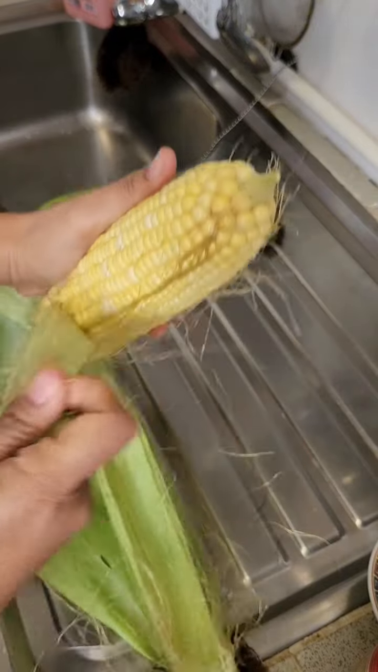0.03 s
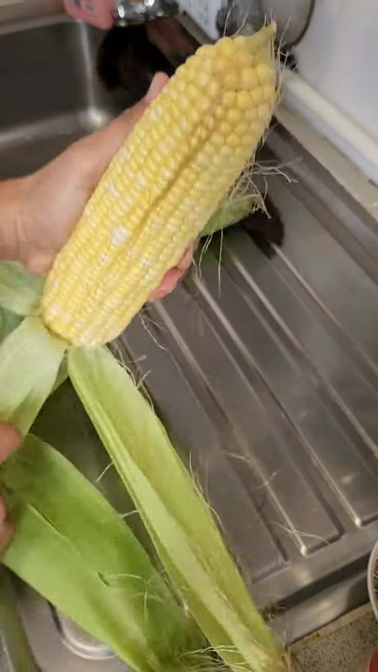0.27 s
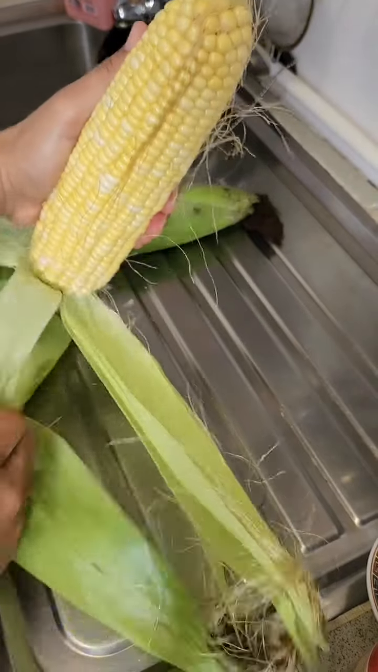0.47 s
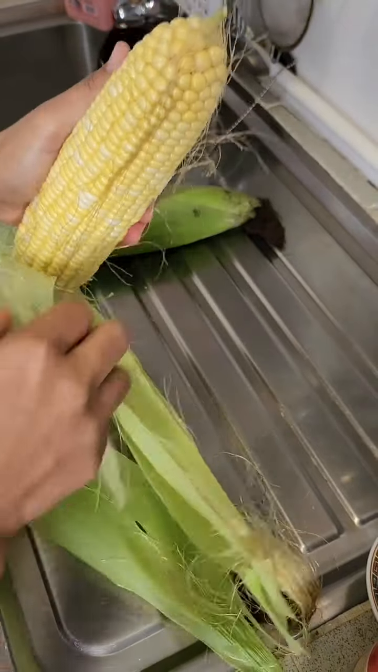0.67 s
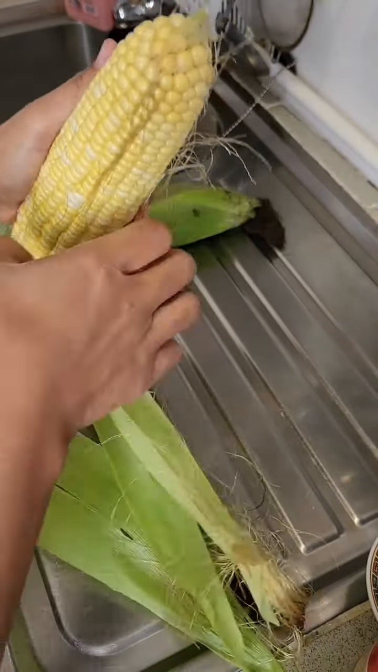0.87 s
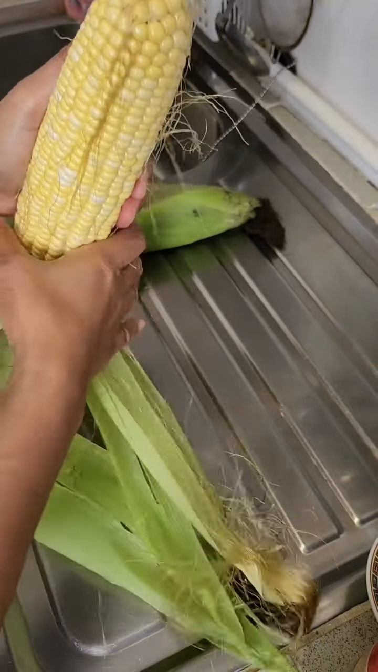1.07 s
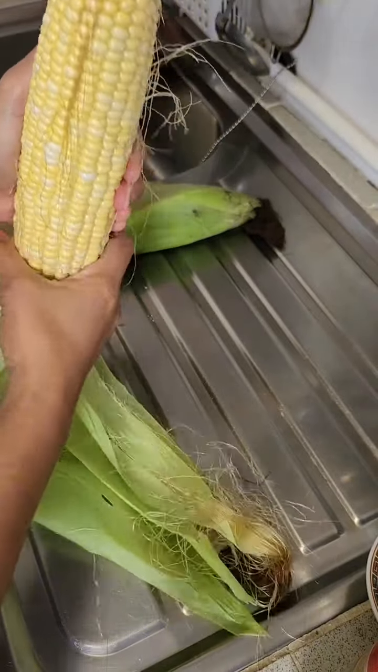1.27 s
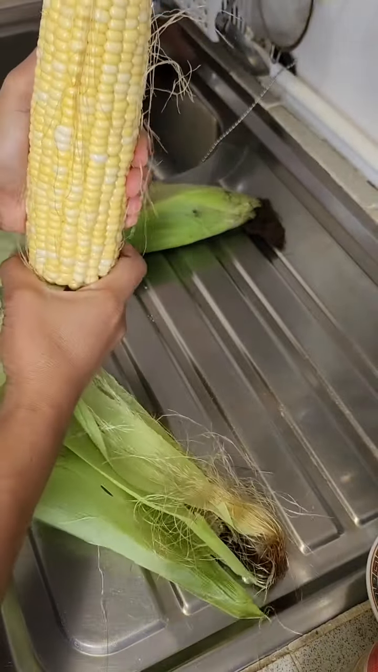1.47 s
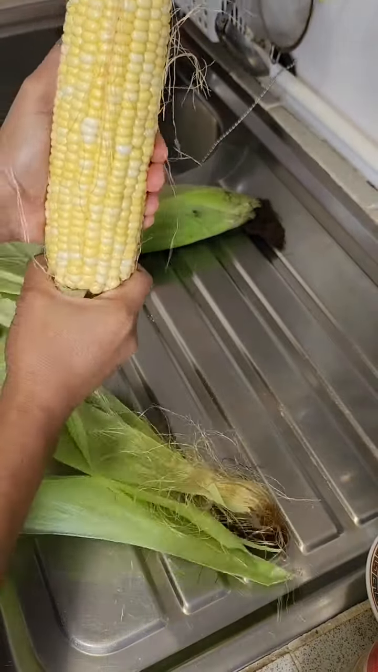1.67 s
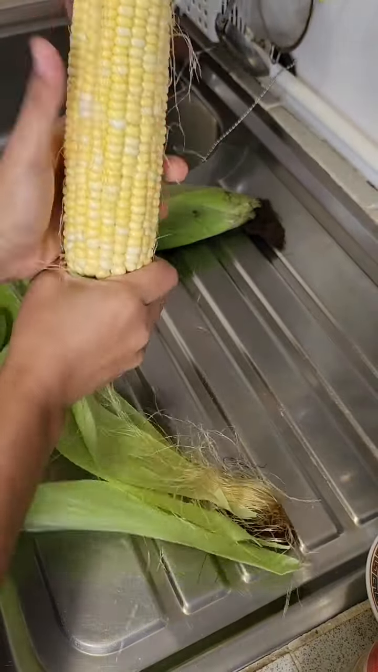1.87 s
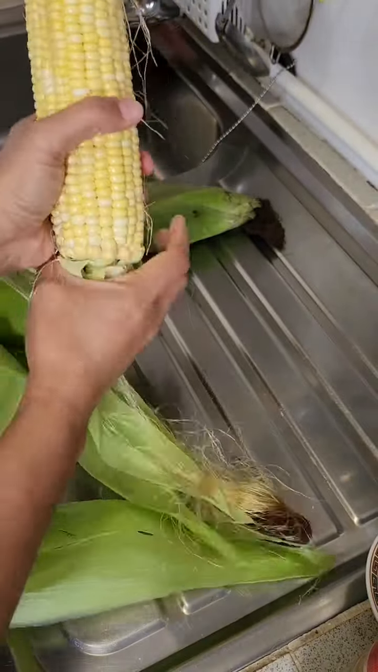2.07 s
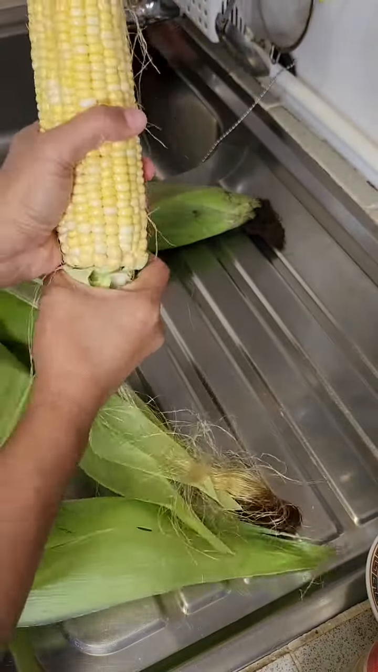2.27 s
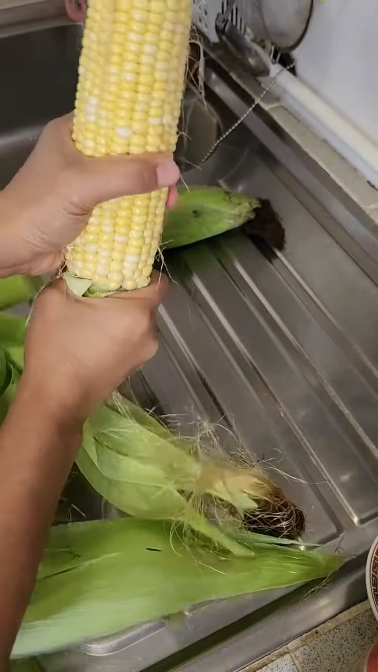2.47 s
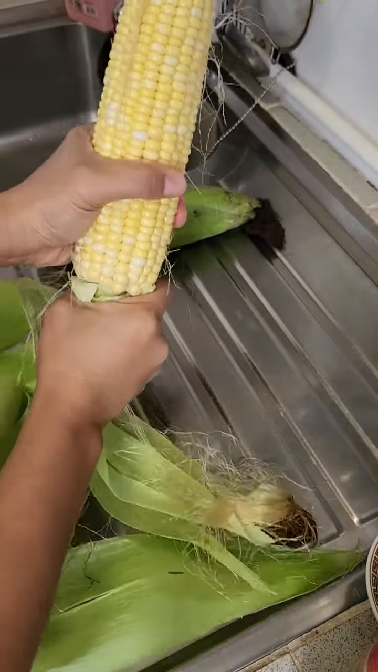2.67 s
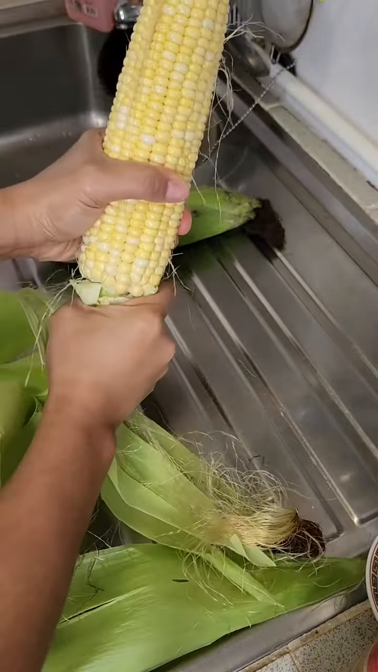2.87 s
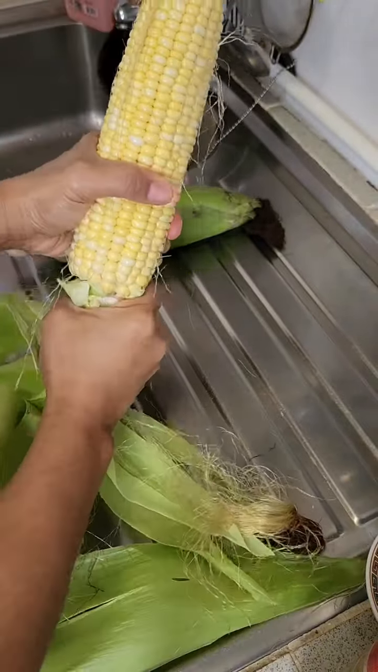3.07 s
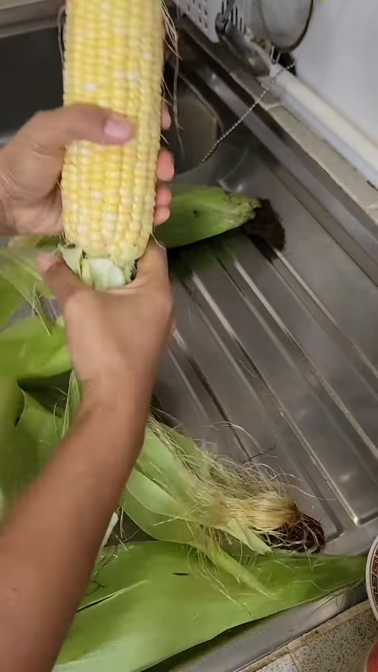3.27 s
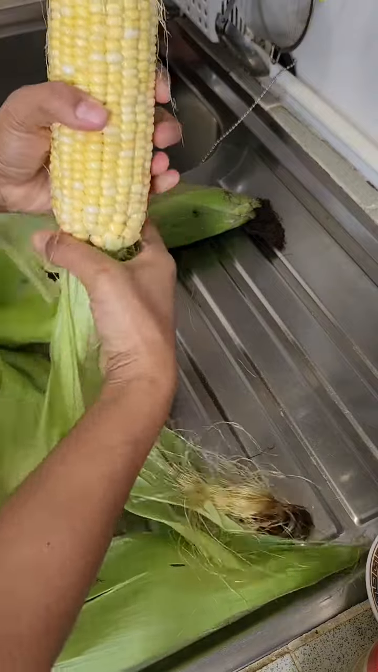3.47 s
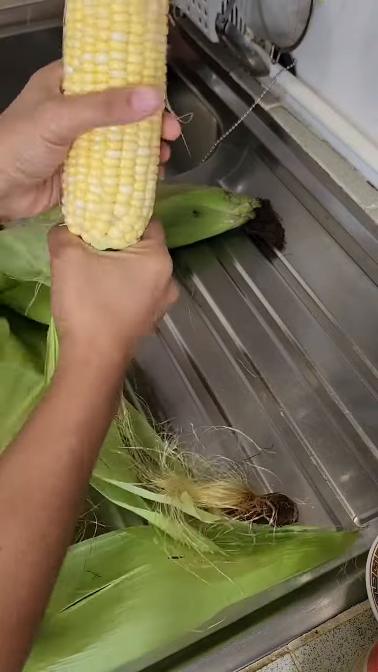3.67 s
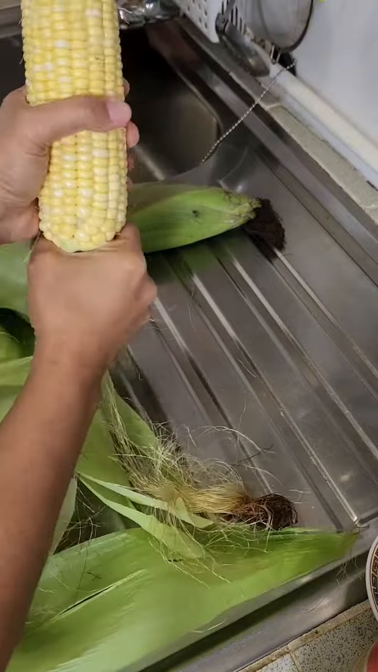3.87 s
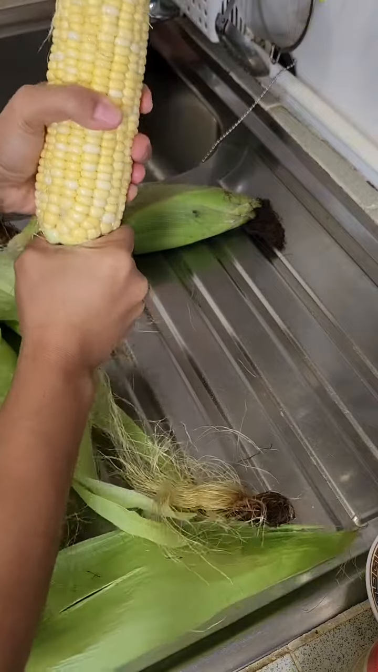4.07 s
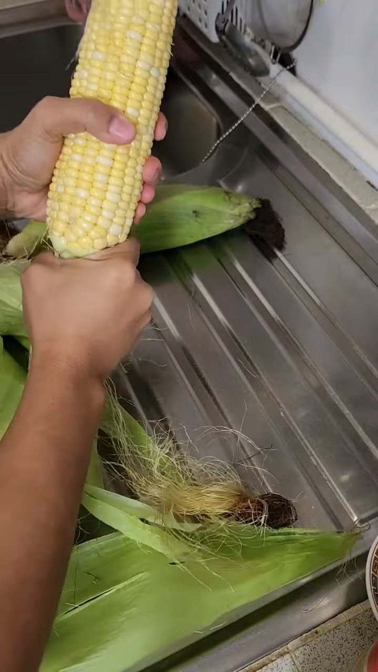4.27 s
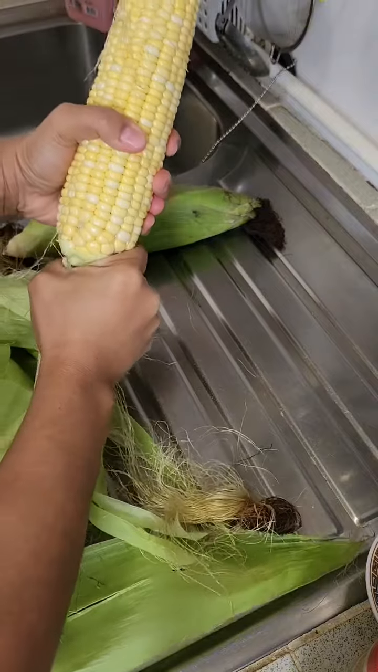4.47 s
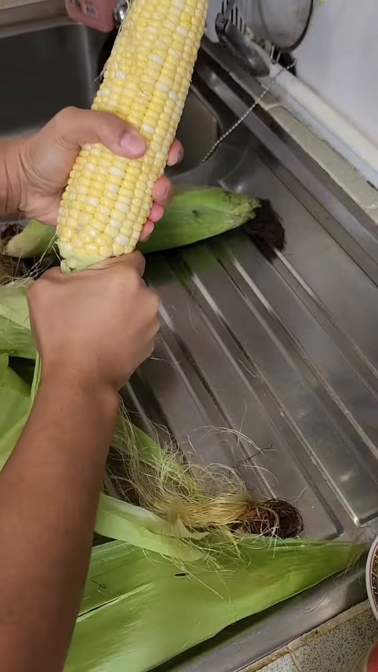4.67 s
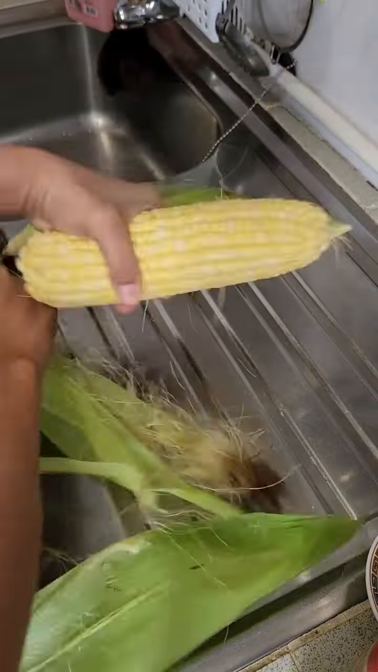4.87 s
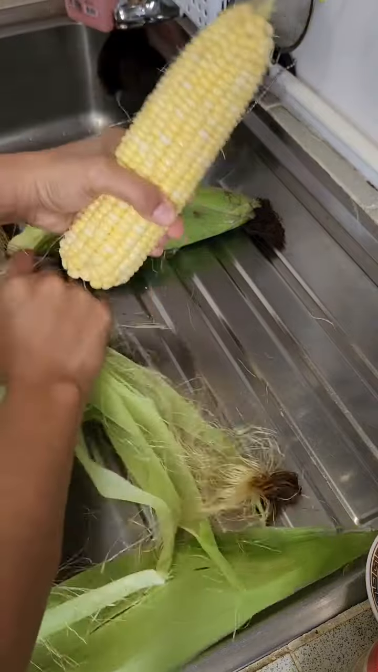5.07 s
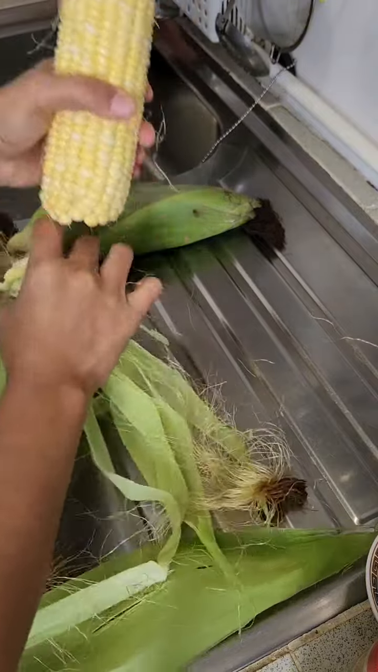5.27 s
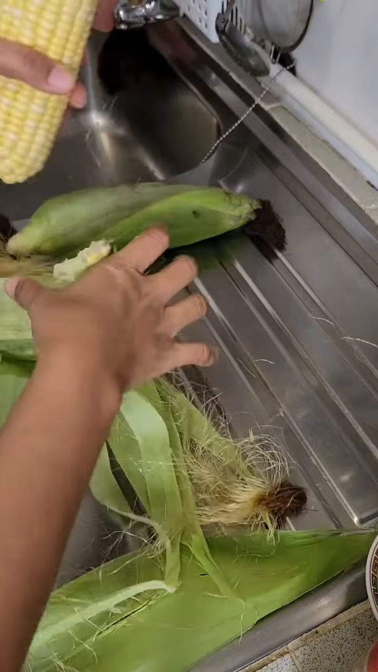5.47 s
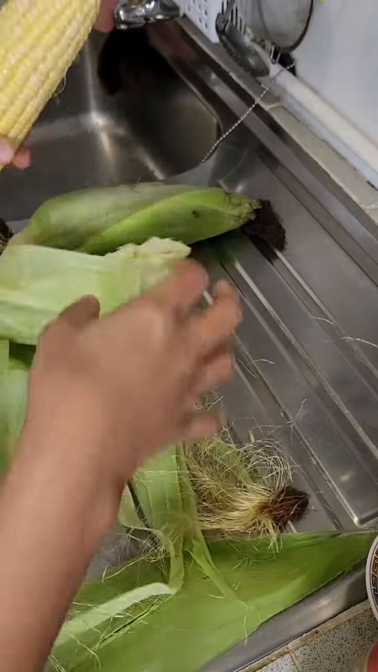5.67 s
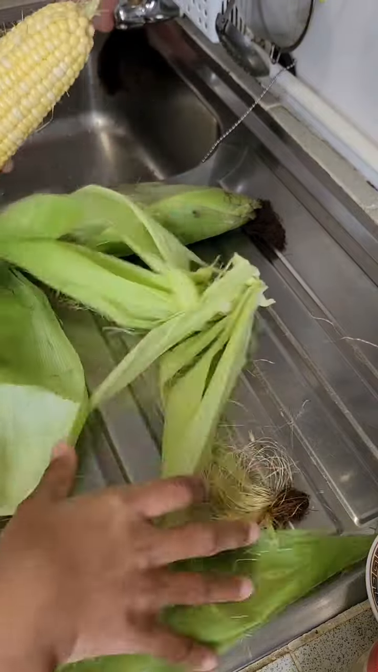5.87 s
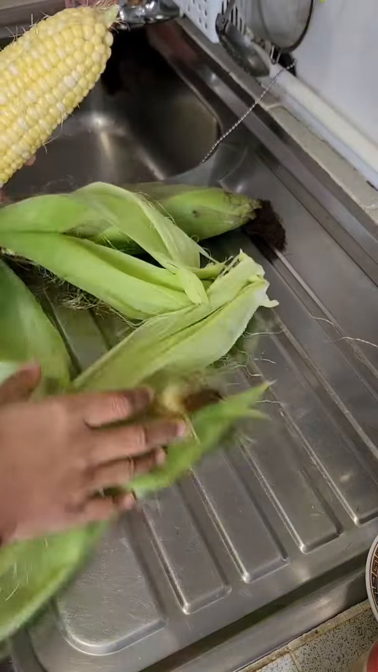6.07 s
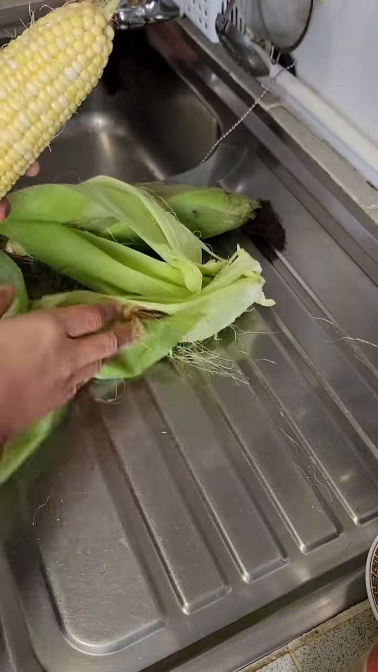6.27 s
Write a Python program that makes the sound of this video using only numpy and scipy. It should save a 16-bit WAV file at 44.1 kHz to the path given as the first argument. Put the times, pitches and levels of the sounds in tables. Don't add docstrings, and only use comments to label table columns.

```python
import sys
import numpy as np
from scipy import signal
from scipy.fft import rfft, irfft, next_fast_len
from scipy.io import wavfile

SR = 44100
rng = np.random.default_rng(int(sys.argv[2]) if len(sys.argv) > 2 else 0)


def natural_amplitude(level_db):
    exponent = np.asarray(level_db, float) / 20
    return 10 ** exponent


def pcm_store(signal):
    levels = np.round(np.clip(np.atleast_2d(signal), -1, 1) * 32767)
    wavfile.write(sys.argv[1], SR, levels.astype(np.int16).T)


N = 278712

# start_s, effort_db, dryness_db
LEAF_SLIDING = [(0, -62.5, -1), (.3, -52.5, -7), (.64, -69.5, 0), (.92, -71.5, -1.5), (.945, -63.5, 1),
                (1.2, -59.5, -2), (1.9, -62, -3), (2.39, -48.5, -7.5), (2.8, -68, 7), (3.2, -53, -9.5),
                (3.465, -65, -4), (3.5, -51.5, -8), (4.05, -54, 0), (4.4, -64, 0), (4.98, -53.5, -4),
                (5.58, -67.5, -8.5), (5.9, -53.5, -4.5), (6.32, -54, -6)]
# start_s, peak_db, edge_above_6_khz_db, t60_s
STALK_BREAK = [
    (4.7715, -8, -18, 0.34),
]
REST_EFFORT_DB = -60
PORT_LAG_S = .00012
FIRST_CLICK = 5


def rms_one(x):
    return x / np.sqrt(np.mean(x ** 2) + 1e-20)


def in_time(rows):
    s, *columns = np.transpose(rows)
    return [np.interp(np.arange(N) / SR, s, c) for c in columns]


def at_hz(points, hz):
    point_hz, point_value = np.transpose(points)
    return np.interp(np.log(hz), np.log(point_hz), point_value)


def add_at(out, start_s, sound):
    i = round(start_s * SR)
    out[..., i:i + sound.shape[-1]] += sound[..., :N - i]


def drift(rate):
    r = np.exp(-80 * np.pi * rate / SR)
    slow = signal.lfilter([1], [1, -2 * r, r * r], rng.standard_normal(N // 40 + 2002))[2000:]
    return np.interp(np.arange(N) / 40, np.arange(len(slow)), rms_one(slow))


def delayed(x, lag_s):
    return np.interp(np.arange(N) - lag_s * SR, np.arange(N), x)


def ring(clicks, hz, t60):
    r, w = natural_amplitude(-60 / (t60 * SR)), 2 * np.pi * hz / SR
    return signal.lfilter([0, np.sin(w)], [1, -2 * r * np.cos(w), r * r], clicks + 1e-18)


def fibres(per_s, spread_db, clump_db):
    sizes = natural_amplitude(spread_db * np.minimum(rng.exponential(1, N), 4)) * rng.choice([-1, 1], N)
    breaks = rng.random(N) < per_s / SR
    return rms_one(sizes * breaks * natural_amplitude(clump_db * drift(260)))


def fibre_pair(per_s, spread_db, clump_db):
    near = fibres(per_s, spread_db, clump_db)
    return near, delayed(near, PORT_LAG_S), fibres(per_s, spread_db, clump_db)


def at_both_ports(pair, alike):
    near, late, other = pair
    alike = np.clip(alike, 0, 1)
    return np.array([near, np.sqrt(alike) * late + np.sqrt(1 - alike) * other])


def rumble():
    # start_s, level_db
    traffic = [(0.0, -47.5), (0.33, -47.5), (0.86, -50), (1.34, -48), (2.08, -47), (3.01, -53),
               (3.99, -47.5), (4.42, -55), (4.82, -46), (5.56, -63.5), (6.13, -49), (6.32, -50)]
    # pitch_hz, width_hz, level_db
    room_modes = [(49.1, 41, -1.5), (63.8, 8.8, 5.5), (111.8, 13, 3), (178, 34, -7), (213.8, 15.5, -5.5),
                  (326, 41, -6), (381.3, 24, -8.5)]
    traffic_db, = in_time(traffic)
    deep_db = traffic_db - 3.5 + 0.5 * drift(4.4)
    grip_db = in_time(LEAF_SLIDING)[0] - REST_EFFORT_DB
    upper_db = -50.5 + 0.48 * (traffic_db - traffic_db.mean()) + 0.5 * drift(5.8)
    upper_db = upper_db + 0.11 * grip_db
    out = 0
    for hz, width_hz, level_db in room_modes:
        r = np.exp(-np.pi * width_hz / SR)
        a = [1, -2 * r * np.cos(2 * np.pi * hz / SR), r * r]
        noise = rng.standard_normal((2, N + SR // 2))
        narrow = signal.lfilter([1, 0, -1], a, signal.lfilter([1, 0, -1], a, noise))
        mid, side = narrow[:, SR // 2:]
        both = rms_one(mid) + natural_amplitude(-12) * rms_one(side) * np.c_[[1, -1]]
        out = out + natural_amplitude(level_db + (deep_db if hz < 150 else upper_db)) * both
    return out


def air():
    # frequency_hz, level_db per Hz
    air_colour = [(18, -22), (30, -7), (48, 4.5), (115, -5), (149, -19.5), (210, -10), (311, -16),
                  (866, -18.5), (1150, -29.5), (2000, -39), (16000, -62.5)]
    hz = np.maximum(np.arange(N // 2 + 1) * SR / N, 1)
    mid, side = rfft(rng.standard_normal((2, N))) * natural_amplitude(at_hz(air_colour, hz))
    scale = natural_amplitude(-59.5) * N / np.sqrt(2 * np.sum(np.abs(mid[hz > 500]) ** 2))
    side = side * natural_amplitude(at_hz([(150, -13.5), (1200, 0.5)], hz))
    ducked = natural_amplitude(0.061 * np.minimum(in_time(LEAF_SLIDING)[0] - REST_EFFORT_DB, 0))
    return ducked * scale * irfft(np.array([mid + side, mid - side]), N)


def tears():
    # start_s, peak_db, edge_above_6_khz_db, t60_s
    thin_snaps = [(.1063, -37, 0.5, 0.64), (.1569, -31, -24, 0.1), (1.1358, -43, 3.5, 0.17),
                  (1.3510, -50.5, 23.5, 0.059), (1.3803, -34, 6.5, 0.064), (1.4580, -25, -4.5, 0.14),
                  (1.6844, -47.5, 21, 0.045), (2.222, -27, -4.5, 0.37), (2.241, -45, 9, 0.19),
                  (2.2594, -27, -32, 0.55), (2.4366, -38.5, 3.5, 0.69), (.171, -23.5, 2, 0.13),
                  (2.5344, -24, -14.5, 0.12), (2.7161, -11.5, -16, 0.049), (3.1492, -30.5, -5, 0.86),
                  (3.2106, -20.5, -19, 0.1), (3.949, -18.5, -6.5, 0.081), (4.1607, -43, 4, 0.085),
                  (4.2093, -47.5, 11.5, 0.12), (4.5253, -31, 3.5, 0.061), (4.9326, -20.5, -32, 0.13),
                  (2.817, -17.5, -7.5, 0.048)]
    thin_rips = [(.1297, -11.5, -10, 0.052), (2.4655, -15.5, -9, 0.077), (.2452, -30.5, 8, 0.11),
                 (1.2191, -31.5, -5.5, 0.23), (1.5802, -35, 7.5, 0.066), (2.5002, -8.5, -7, 0.047),
                 (2.6404, -26, -5, 0.23), (3.0475, -34.5, -4.5, 0.17), (3.3214, -33, -19, 0.16),
                 (3.6327, -21, -26, 0.091), (4.0218, -27.5, -7, 0.23), (4.569, -38.5, -2, 0.14),
                 (5.875, -19, -23, 0.062), (5.68, -43, -38, 0.44), (4.7485, -49, -11.5, 0.036),
                 (4.7685, -13, -12, 0.032)]
    thick_snaps = [(.2248, -15.5, -24, 0.053), (.3487, -25.5, -4, 0.11), (.4987, -28.5, -23, 0.11),
                   (.9373, -51.5, 0.5, 0.047), (1.05, -38.5, -13, 0.16), (1.2365, -18.5, -6, 0.032),
                   (1.5045, -26.5, -3.5, 0.25), (1.5278, -30.5, -18.5, 1), (2.0507, -28, -20, 0.14),
                   (2.3126, -22.5, -7.5, 0.57), (2.3537, -18.5, -14, 0.33), (2.382, -18, -17, 0.18),
                   (2.6278, -19, -6, 0.037), (2.9628, -22.5, -7.5, 0.17), (3.5358, -29.5, -7.5, 0.24),
                   (3.8222, -27, -25, 0.21), (3.918, -15, -33, 0.091), (3.9885, -25, -19, 0.11),
                   (4.089, -37, 6, 0.041), (4.2954, -21, -3.5, 0.075), (4.3088, -20.5, -3.5, 0.11),
                   (4.6626, -34.5, -6, 0.079), (4.8936, -28, -9, 0.12), (5.1048, -32, -56, 0.092),
                   (5.216, -28, -29, 0.085), (5.3138, -38.5, -14, 0.33), (5.4574, -35.5, -18, 0.33),
                   (5.938, -39, -10, 0.49), (2.19, -48, 5, 0.025), (2.69, -26, -6, 0.1)]
    thick_rips = [(.0568, -30, -5.5, 0.11), (.0940, -23.5, -3, 0.17), (.264, -19.5, 1, 0.06),
                  (.3165, -31, -3, 0.078), (.3267, -6.5, -19, 0.027), (.4226, -33, -13.5, 0.87),
                  (1.12, -41.5, 1, 0.13), (1.4371, -37, -9, 0.11), (1.5474, -23.5, -12, 0.058),
                  (1.7709, -29.5, -12, 0.15), (1.9964, -34, -22, 1), (2.585, -33.5, 1, 0.11),
                  (2.6745, -6, -11.5, 0.19), (2.8565, -12.5, -7.5, 0.14), (3.083, -33, -4, 0.036),
                  (3.492, -27.5, -16, 0.36), (3.8442, -23, -18, 0.52), (3.8867, -20, -15, 0.29),
                  (4.0472, -27.5, -8, 0.19), (4.126, -17.5, -8, 0.018), (4.442, -38, -7, 0.093),
                  (4.8492, -17, -32, 0.21), (5.0641, -29, -42, 0.058), (5.1377, -27.5, -21, 0.076),
                  (5.1976, -40, -7.5, 0.15), (5.701, -38, -14, 0.11), (4.782, -19.5, 1.5, 0.11),
                  (5.6, -37.5, -50, 0.63), (6.097, -49.5, 6, 0.079), (6.223, -35, -5, 0.21)]
    kinds = [(thin_snaps, -11.5, 2.5), (thin_rips, -11.5, -7), (thick_snaps, -3, 2.5),
             (thick_rips, -3, -7), (STALK_BREAK, -20.5, 22.5)]
    return [(s, peak_db, body_db, edge_db, t60, first_db)
            for rows, body_db, first_db in kinds for s, peak_db, edge_db, t60 in rows]


def tear_envelopes(centres, body, edge):
    tearing, after, events = np.zeros((len(centres), N)), np.arange(SR // 4) / SR, tears()
    colours = 2 * rng.standard_normal((len(events), len(centres)))
    for (s, peak_db, body_db, edge_db, t60, snap_db), own_db in zip(events, colours):
        snap = natural_amplitude(snap_db - 60 * after / (.011 + 0.055 * t60))
        tail = natural_amplitude(-60 * after / (t60 * (1 + 0.076 * body[:, None])))
        gains = natural_amplitude(peak_db - 22.5 + body * body_db + edge * (edge_db + 4.5) + own_db)
        rise_s = .0007 * natural_amplitude(-1.3 * min(snap_db, 4))
        add_at(tearing, s, gains[:, None] * (snap + tail) * np.clip(after / rise_s, 0, 1))
    return tearing


def husks():
    # frequency_hz, level_db per band
    husk_colour = [(300, -4.5), (500, -8), (900, -5), (1500, -1.5), (2200, -1), (3500, 2.5), (5000, 8.5),
                   (7500, 0.5), (11000, 11), (16000, 0.5)]
    # frequency_hz, left_over_right_db
    ear_tilt = [(60, -1.0), (150, 12), (380, -10), (950, -2.5), (2380, -3.5), (5980, 6), (15000, -5)]
    # frequency_hz, common_share
    likeness = [(300, 1), (700, 0.68), (1500, 0.057), (5000, 0.013), (14000, 0.18)]
    edges = 300 * 2 ** np.arange(0, 6.1, .5)
    centres = np.sqrt(edges[1:] * edges[:-1])
    body = np.clip(np.log2(1700 / centres) / 0.79, 0, 1)
    edge = np.clip(np.log2(centres / 2400) / 1.43, 0, 1)
    tearing = tear_envelopes(centres, body, edge)
    ripping, sliding = fibre_pair(11000, 3.5, 0.29), fibre_pair(14000, 1.4, 1.3)
    effort_db, dryness_db = in_time(LEAF_SLIDING)
    middle_db = effort_db - 7 - dryness_db
    hiss_db = effort_db - 5 + dryness_db
    rub_db = -53.5 + 0.4 * (effort_db - REST_EFFORT_DB)
    flutter, out = 0.95 * drift(22), 0
    for k, hz in enumerate(centres):
        level_db = (1 - body[k] - edge[k]) * middle_db + body[k] * rub_db + edge[k] * hiss_db
        alike = at_hz(likeness, hz)
        patch_db = 2.2 * np.roll(flutter, 9973 * (k + 1))
        rip = at_both_ports(ripping, alike) * tearing[k] * natural_amplitude(patch_db)
        rustle = at_both_ports(sliding, 0.62 * alike) * natural_amplitude(level_db - 5 + flutter + 2.5 * drift(8.8))
        sos = signal.butter(2, [edges[k], edges[k + 1]], "band", fs=SR, output="sos")
        per_band = (-1) ** k * np.sqrt(SR / 2 / (edges[k + 1] - edges[k]))
        colour = natural_amplitude(at_hz(husk_colour, hz) + np.c_[[.5, -.5]] * at_hz(ear_tilt, hz))
        out = out + per_band * colour * signal.sosfilt(sos, rip + rustle)
    return out


def creases(leaves):
    effort = np.sqrt(signal.lfilter([.006], [1, -.994], leaves[0] ** 2))
    buckles = effort * fibres(800, 2.5, 1.5)
    dealt = rng.integers(0, 16, N)
    out = np.zeros(N)
    for k, hz in enumerate(np.geomspace(600, 4500, 16)):
        out += ring(buckles * (dealt == k), hz, 22 / hz) * np.sqrt(hz / 2000)
    return natural_amplitude(-19) * np.array([out, natural_amplitude(-30.5) * delayed(out, PORT_LAG_S)])


def needles():
    # start_s, peak_db, centre_hz
    tough_fibres = [(0.0577, -29, 5400), (0.062, -33, 8500), (0.1008, -22, 8600), (0.1106, -18, 8000),
                    (0.1211, -23, 7900), (0.1316, -15, 5000), (0.1568, -26, 3900), (0.1719, -16, 7800),
                    (0.1859, -20, 7700), (0.2254, -26, 3500), (0.2465, -21, 7100), (0.2646, -17, 8600),
                    (0.3498, -21, 4200), (1.3515, -11, 10800), (1.3833, -12, 8500), (1.4582, -5, 6350),
                    (1.5048, -9, 6500), (1.6855, -12, 9800), (2.3551, -23, 4300), (2.3746, -20, 3900),
                    (2.4418, -22, 6700), (2.4682, -20, 5300), (2.5057, -17, 6200), (2.6763, -20, 2800),
                    (2.6846, -19, 4600), (2.7164, -16, 3300), (2.8183, -24, 4800), (2.8578, -18, 6600),
                    (2.8751, -16, 2200), (2.8872, -19, 5200), (2.9686, -13.5, 5500), (3.0504, -23, 5400),
                    (3.1495, -24, 4900), (3.2131, -21, 4100), (4.0808, -32, 5800), (4.09, -27, 6200),
                    (4.2962, -21, 7600), (4.2999, -22, 5800), (4.3103, -18, 5500), (4.5259, -31, 6700),
                    (4.5289, -20, 6400), (4.7722, -5, 4500)]
    # start_s, peak_db, centre_hz
    stalk_fibre = [
        (4.7712, -4, 3200),
    ]
    rows, span = list(tough_fibres) + list(stalk_fibre), 1.9
    out = np.zeros((2, N))
    for (s, peak_db, hz), (sign, echo) in zip(rows, rng.uniform(-1.1, 1, (len(rows), 2))):
        click = np.zeros(256)
        click[[0, int(30 + 10 * echo)]] = np.sign(sign), .45 * np.sign(echo)
        sos = signal.butter(2, [hz / span, min(hz * span, .45 * SR)], "band", fs=SR, output="sos")
        sound = signal.sosfilt(sos, click)
        sound = natural_amplitude(peak_db + 2.5) * sound / np.abs(sound).max()
        i, lag = round(s * SR), round(PORT_LAG_S * SR)
        out[0, i:i + 256] += sound
        out[1, i + lag:i + lag + 256] += sound * natural_amplitude(-5)
    return out


def volleys(rows, span):
    out, after = np.zeros((2, N)), np.arange(SR // 6) / SR
    shared, lag = 0.77, round(PORT_LAG_S * SR)
    draws = rng.standard_normal((len(rows), 3, len(after)))
    for (s, peak_db, hz, t60), (near, other, lumps) in zip(rows, draws):
        far = shared * np.roll(near, lag) + (1 - shared) * other
        volley = np.array([near, far]) * natural_amplitude(2.5 * lumps)
        volley[0, 0] = volley[1, lag] = FIRST_CLICK * np.sqrt(SR / 2 / hz)
        sos = signal.butter(2, [hz / span, min(hz * span, .45 * SR)], "band", fs=SR, output="sos")
        sound = signal.sosfilt(sos, volley * natural_amplitude(-60 * after / t60))
        add_at(out, s, natural_amplitude(peak_db - 3) * sound / np.abs(sound[0]).max())
    return out * natural_amplitude([[0], [-5.5]])


def ticks():
    # start_s, peak_db, centre_hz, t60_s
    strands = [(.100, -27, 12000, .15), (.1716, -24, 9000, .05), (1.2365, -34, 4000, .04),
               (1.4575, -21, 4500, .04), (1.504, -37, 2500, .05), (1.685, -42, 3500, .04),
               (2.05, -35, 9000, .15), (2.2223, -19, 7000, .03), (2.873, -27, 5000, .03),
               (2.926, -44, 9000, .04), (3.55, -42, 800, .15), (3.61, -48, 9000, .05),
               (3.71, -48, 9000, .06), (3.725, -28, 750, .15), (3.76, -24, 750, 0.24),
               (4.271, -35, 8000, .05), (4.443, -46, 7000, .05), (4.487, -36, 7000, .04),
               (4.5255, -15, 7500, .08), (4.593, -50, 8000, .04), (4.7725, -23, 480, 0.18),
               (4.786, -24, 3500, .04), (4.798, -26.5, 2500, .04), (4.828, -26, 2500, .04),
               (5.29, -37.5, 8000, 0.14)]
    return volleys(strands, 1.5)


def crackles():
    # start_s, peak_db, centre_hz, t60_s
    pockets = [(.1002, -13, 12000, 0.087), (.1105, -19, 2000, .03), (.1315, -25, 3900, .02),
               (.157, -32, 2000, .03), (.1775, -22, 11000, .05), (0.226, -31, 1900, .03),
               (.2454, -28, 4500, 0.016), (.2645, -30, 8500, .02), (.279, -34, 2500, .03),
               (0.3277, -38, 2200, .03), (.3495, -26, 2600, .03), (.351, -34, 6000, .02),
               (1.237, -38, 885, 0.03), (1.502, -33, 1300, .04), (1.545, -23, 2800, 0.065),
               (2.223, -20.5, 2980, 0.023), (2.2415, -13.5, 8500, .04), (2.259, -14, 8500, .03),
               (2.314, -10, 9650, 0.043), (2.3135, -17, 1500, 0.032), (2.355, -28, 4000, .08),
               (2.383, -8, 4060, 0.063), (2.438, -10, 6600, 0.12), (2.467, -22, 3400, .06),
               (2.499, -16, 4180, .04), (2.5046, -2, 5970, 0.071), (2.533, -14, 3800, .02),
               (2.568, -26, 10050, .04), (2.6753, -10.5, 1550, 0.028), (2.676, -7, 4200, 0.033),
               (2.716, -11, 1480, .03), (3.636, -38, 2470, .05), (3.733, -34, 370, 0.053),
               (3.853, -24.5, 328, 0.056), (3.888, -29, 900, .05), (3.919, -32, 654, .06),
               (3.9502, -5.5, 10250, 0.093), (3.9895, -23, 1400, .03), (4.049, -28, 4100, .03),
               (4.5255, -33, 6000, .06), (4.7762, -8.5, 2550, .05), (4.7708, -15.5, 600, 0.04),
               (4.7716, -6, 5700, 0.092), (4.812, -21.5, 690, 0.055), (4.853, -17, 1900, .05),
               (5.104, -32, 1200, .03), (5.139, -34, 1100, .05), (5.218, -41, 1300, .04),
               (5.815, -38, 2600, .04), (5.944, -25.5, 1300, .04)]
    return volleys(pockets, 1.208)


def squeaks():
    # start_s, length_s, level_db, pitch_hz
    rubs = [(.105, 0.037, -39, 5450), (2.285, 0.024, -41, 2380), (3.312, 0.031, -48, 2650),
            (3.51, 0.042, -47, 1750), (3.547, .03, -45, 1810), (3.654, 0.05, -48.5, 1360),
            (3.666, 0.051, -49.5, 2320), (3.867, .03, -43, 1400), (4.932, 0.026, -40, 2330),
            (5.02, 0.047, -53, 1700), (5.297, 0.054, -53.5, 1820), (5.521, 0.075, -57.5, 1120),
            (5.6, .07, -62, 2450), (5.656, 0.027, -54.5, 1330), (5.708, 0.082, -62, 2480)]
    out, after = np.zeros((2, N)), np.arange(SR // 6) / SR
    for (s, length_s, level_db, hz), noise in zip(rubs, rng.standard_normal((len(rubs), 2, len(after)))):
        sung = rms_one(ring(noise + noise[0], hz, 0.023))
        swell = np.sin(np.pi * np.clip(after / length_s, 0, 1))
        add_at(out, s, natural_amplitude(level_db) * sung * swell)
    return out


def pops():
    # start_s, peak_db, pitch_hz, t60_s
    folds = [(0.172, -11.5, 1290, 0.029), (0.327, -14, 2630, 0.03), (0.348, -6, 2570, 0.014),
             (0.498, -20.5, 1260, 0.031), (1.236, -16, 665, 0.013), (1.458, -11.5, 2020, 0.03),
             (1.503, -21, 1390, 0.03), (2.051, -21, 1340, 0.03), (2.312, -15, 1010, 0.027),
             (2.381, -22, 935, 0.038), (2.503, -28.5, 3200, 0.035), (2.6764, -3, 1550, 0.0098),
             (2.692, -5.5, 1380, 0.068), (2.715, -40, 1380, 0.03), (2.859, -11.5, 840, 0.032),
             (2.873, -8, 1230, 0.026), (2.965, -12.5, 1350, 0.019), (3.674, -29, 2260, 0.034),
             (3.919, -53, 1350, 0.033), (3.952, -7, 1470, 0.046), (4.296, -10, 2540, 0.023),
             (4.7709, 6.5, 3160, 0.02), (4.7714, -1, 1860, 0.039), (4.841, -10.5, 1590, 0.034),
             (4.945, -38, 1610, 0.03), (5.105, -22.5, 1740, 0.023), (5.315, -36, 1880, 0.03),
             (5.468, -43, 1730, 0.032), (5.667, -31, 1360, 0.025), (5.937, -17.5, 1295, 0.024)]
    out, after = np.zeros((2, N)), np.arange(SR // 10) / SR
    pushes = rng.standard_normal((len(folds), 2, len(after))) * natural_amplitude(-60 * after / .007)
    pushes[:, :, 0] = FIRST_CLICK
    for (s, peak_db, hz, t60), (near, other) in zip(folds, pushes):
        push = np.array([near, 1.64 * np.roll(near, round(PORT_LAG_S * SR)) + 0.12 * other])
        t60 = min(t60, .022)
        sound = ring(push, hz, t60) + .5 * ring(push, 1.45 * hz, t60)
        add_at(out, s, natural_amplitude(peak_db - 12.5) * sound / np.abs(sound[0]).max())
    return out


def nudges():
    # start_s, level_db, t60_s
    bumps = [
        (.255, -38, 0.13),
        (0.33, -24, 0.095),
        (0.499, -31, 0.16),
        (1.52, -38.5, 0.32),
        (2.05, -38.5, 0.24),
        (3.49, -41.5, 0.19),
        (3.72, -38.5, 0.46),
        (3.845, -25, 0.11),
        (2.55, -41, 0.43),
        (5.866, -30, 0.11),
    ]
    force, after = np.zeros(N), np.arange(SR // 4) / SR
    for s, level_db, t60 in bumps:
        add_at(force, s, natural_amplitude(level_db - 60 * after / t60) * np.clip(after / 0.019, 0, 1))
    sos = signal.butter(3, [144, 448], "band", fs=SR, output="sos")
    return force * rms_one(signal.sosfilt(sos, rng.standard_normal(N)))


def steel_sheet():
    # start_s, level_db, free_s until a hand damps it
    blows = [
        (3.762, -40, 0.014),
        (3.85, -39, 0.017),
        (4.775, -22.5, 0.14),
        (5.8724, -15, 0.11),
        (5.938, -33.5, 0.041),
    ]
    # pitch_hz, level_db, t60_s
    sheet_modes = [(111.4, -6.5, 0.6), (213.8, 1, 0.15), (251.4, -2, 0.058), (315, -7.5, 0.069),
                   (407, -15.5, 0.042)]
    out, after = np.zeros(N), np.arange(SR // 2) / SR
    hz, level_db, t60 = np.transpose(sheet_modes)[:, :, None]
    sag = after + 0.24 * 0.0069 * (1 - np.exp(-after / 0.011))
    swell = 1 - np.exp(-after * hz / 0.74)
    modes = natural_amplitude(level_db - 60 * after / t60) * swell * np.sin(2 * np.pi * hz * sag)
    ringing = np.sum(modes, axis=0)
    for s, blow_db, free_s in blows:
        damped = natural_amplitude(-60 * np.maximum(after - free_s, 0) / 0.1)
        add_at(out, s, natural_amplitude(blow_db) * ringing * damped)
    out = signal.sosfilt(signal.butter(4, 334, fs=SR, output="sos"), out)
    return out * natural_amplitude([[.6], [-.6]])


def stalk_wood():
    # pitch_hz, width_hz, level_db
    wood_modes = [(366, 110, -1.5), (537, 150, -3.5), (1370, 150, -3.5), (1900, 170, -1), (2680, 180, -2.5),
                  (3190, 120, -3), (4530, 360, -4.5), (5670, 85, 0)]
    after = np.arange(N) / SR - STALK_BREAK[0][0]
    force = fibres(3000, 2.8, 3.8) * natural_amplitude(-60 * np.maximum(after, 0) / 0.19) * (after > 0)
    out = np.zeros(N)
    for k, (hz, width_hz, level_db) in enumerate(wood_modes):
        out += natural_amplitude(level_db) * ring(force, hz, 1.22 / width_hz) * np.sqrt(width_hz / SR) * (-1) ** k
    return natural_amplitude(-4) * np.array([out, natural_amplitude(-1.5) * delayed(out, PORT_LAG_S)])


def kitchen(x):
    t60_s, wall_cut_hz = 0.13, 13000
    size = next_fast_len(N + SR // 2)
    phase = -2j * np.pi * np.arange(size // 2 + 1) / size
    turn = np.exp(phase)
    dull = np.exp(-2 * np.pi * wall_cut_hz / SR)
    response = np.zeros((2, len(turn)), complex)
    for k, lag in enumerate((rng.uniform(.006, 0.023, 16) * SR).astype(int)):
        loop = natural_amplitude(-60 * lag / SR / t60_s) * (1 - dull) / (1 - dull * turn) * np.exp(lag * phase)
        response[k % 2] += loop / (1 - loop) * (-1) ** (k // 2)
    return irfft(rfft(x, size) * response, size)[:, :N]


def scene():
    # start_s, left_over_right_db
    hands = [(0, 1.5), (1, 2), (2, 2), (2.7, 2.5), (3.3, 2), (4, 2), (4.7, 1.5), (5.1, 3), (6.32, 2)]
    fibre_sound = husks()
    leaves = fibre_sound + creases(fibre_sound) + pops() + stalk_wood()
    close = leaves + needles() + ticks() + crackles() + squeaks()
    around = rumble() + air() + nudges() + steel_sheet() + natural_amplitude(-12) * kitchen(leaves.mean(axis=0))
    lean_db, = in_time(hands)
    return close * natural_amplitude(np.c_[[.5, -.5]] * lean_db) + around


def band_limit(x):
    return signal.sosfilt(signal.butter(12, 16820, fs=SR, output="sos"), x)


def record(dry):
    rounded = 0.94 * np.tanh(dry / 2.0)
    mix = signal.sosfilt(signal.cheby2(16, 44, 16050, fs=SR, output="sos"), rounded)
    return band_limit(mix)


dry = scene()
out = record(dry)
pcm_store(out)
```